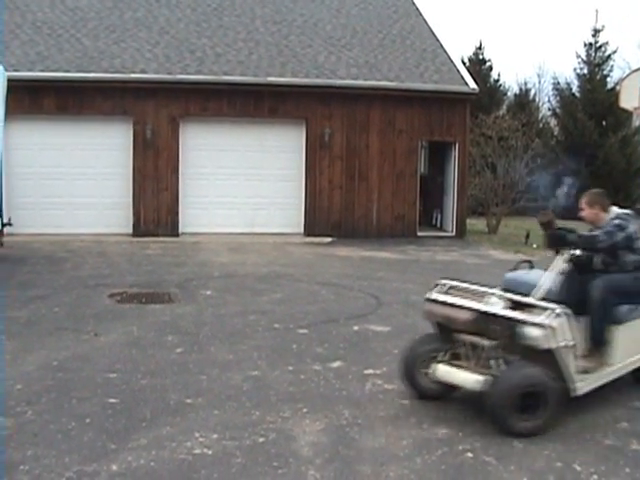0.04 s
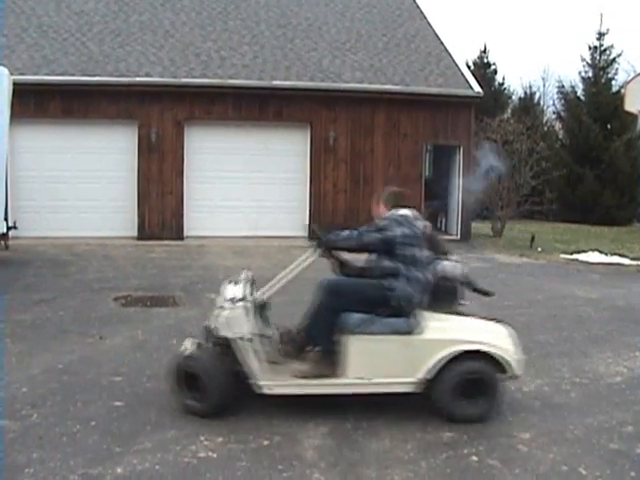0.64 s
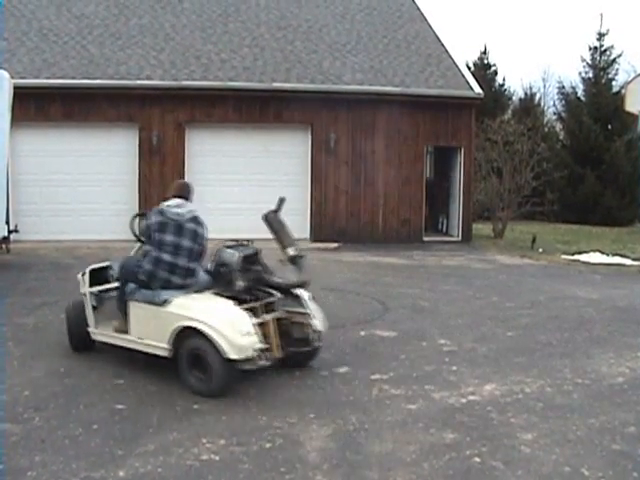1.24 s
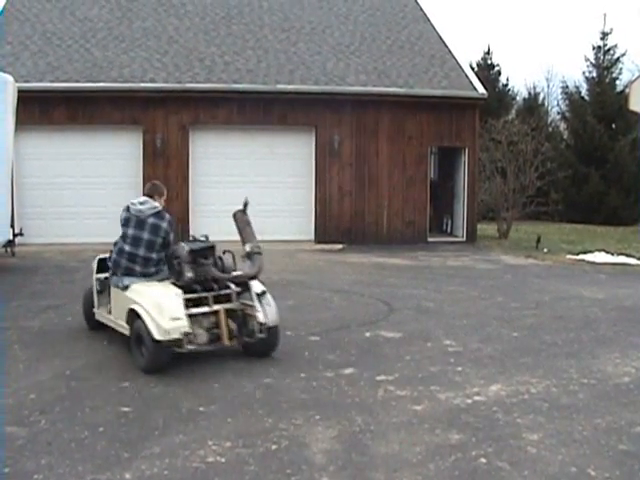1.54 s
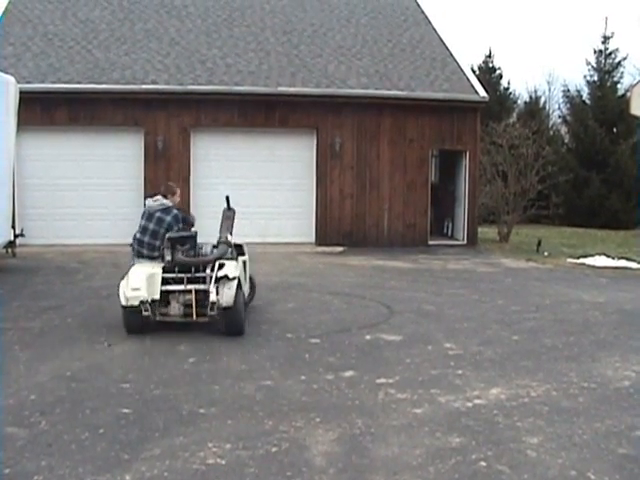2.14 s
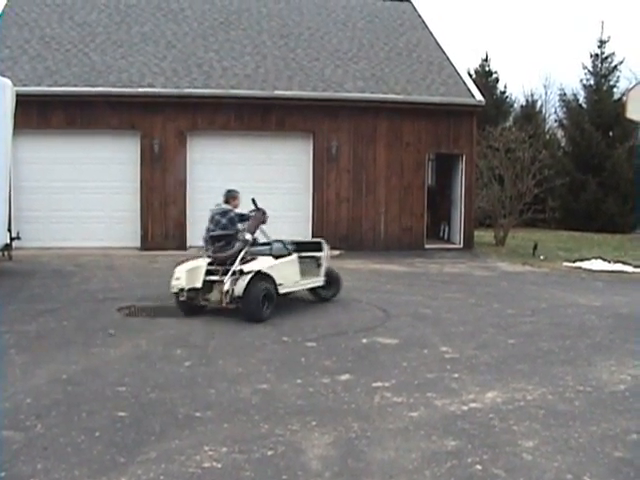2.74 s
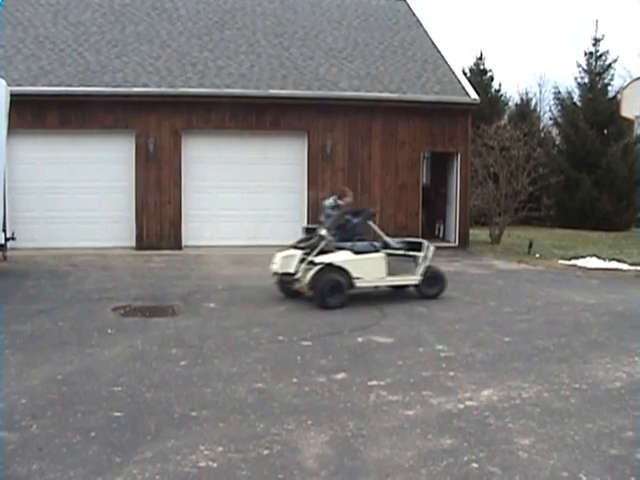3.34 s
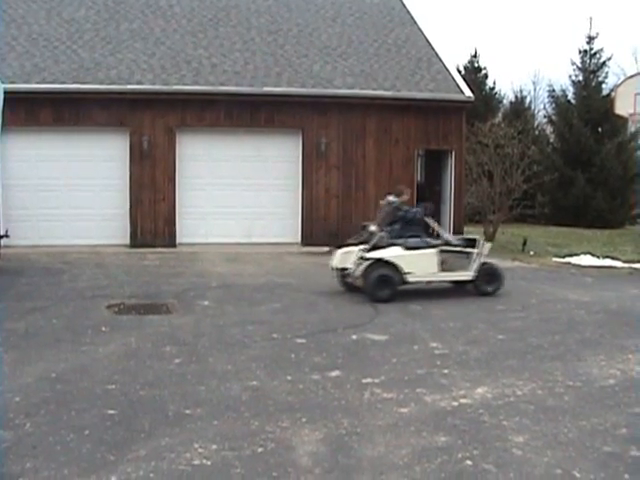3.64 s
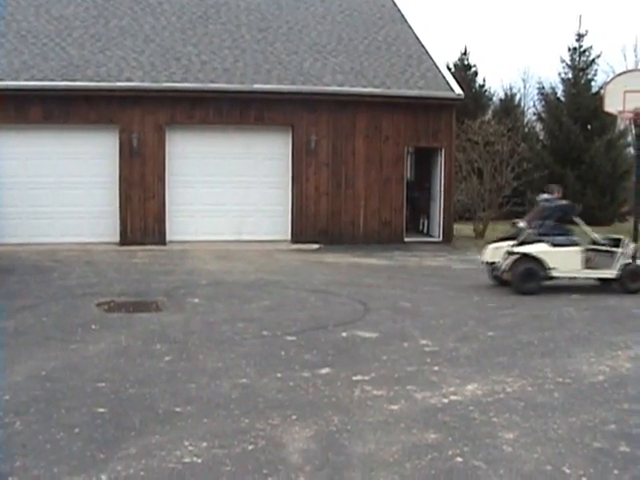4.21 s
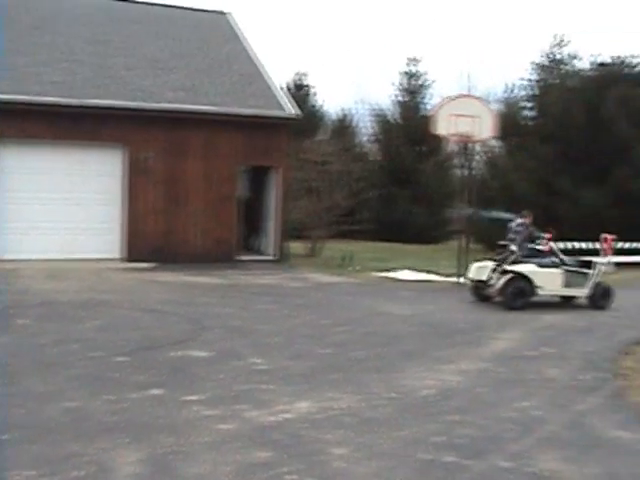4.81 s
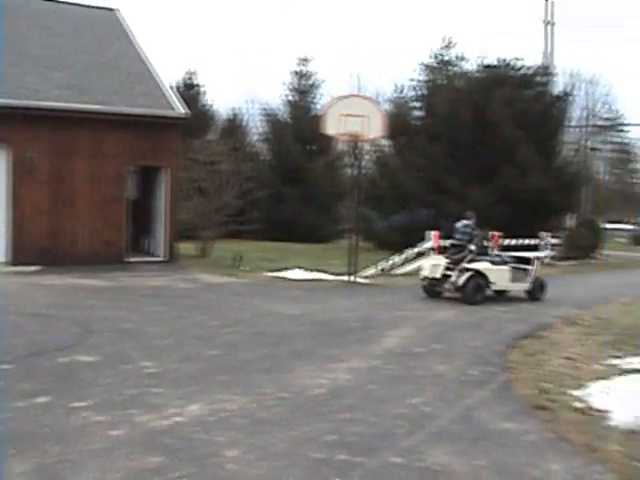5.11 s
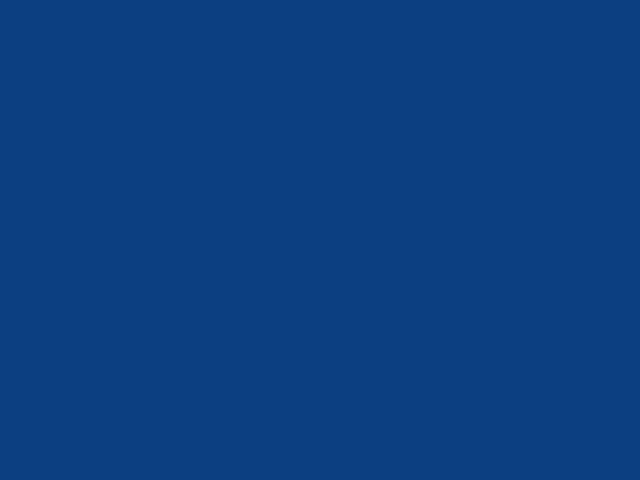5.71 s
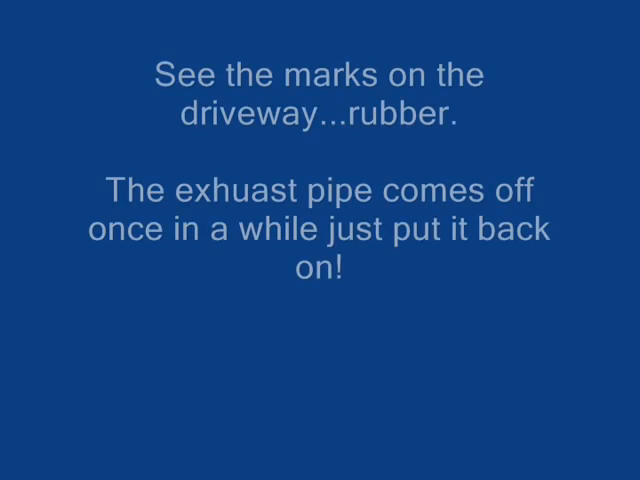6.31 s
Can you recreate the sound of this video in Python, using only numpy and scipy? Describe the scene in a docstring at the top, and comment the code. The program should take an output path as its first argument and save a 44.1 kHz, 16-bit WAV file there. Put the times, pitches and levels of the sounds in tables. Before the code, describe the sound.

Heard in stereo from one spot on a driveway, a cart's two-stroke engine sputters and pops, with one quick rev near the start. After coasting close by, it pulls away in a longer, rising, raspy buzz with a booming exhaust, then slackens, pops again and gives a last smaller rev. Low tyre rumble and a faint dull wall echo accompany it until the sound stops suddenly.

```python
"""A two-stroke cart with an upright exhaust stack circles a driveway, 3 to 15 m from a stereo microphone.
On the throttle the firings come evenly and the exhaust rasps; off it the engine pumps, stutters and pops.
The pipe booms and the stack howls as crank orders pass through their resonances; tyres rumble beneath.
A garage wall throws back a dull echo. The sound stops abruptly while the cart is still rolling."""
import sys
import numpy as np
from scipy import signal
from scipy.fft import rfft, irfft
from scipy.io import wavfile
from scipy.ndimage import uniform_filter1d

SR = 44100
rng = np.random.default_rng(int(sys.argv[2]) if len(sys.argv) > 2 else 0)


def persist_wave(psi):
    """Save psi, clipped to +-1, as 16-bit WAV."""
    counts = np.round(np.clip(psi, -1, 1) * 32767).astype(np.int16)
    wavfile.write(sys.argv[1], SR, np.atleast_2d(counts).T)


N = 284886
TIME = np.arange(N) / SR
BIN_HZ = np.maximum(np.arange(N // 2 + 1) * SR / N, 1)

# Speed of the crank. Each row: time in seconds, turns per second.
CRANK_SPEED = [(0.0, 128.3), (0.3, 120.7), (0.414, 119.7), (0.709, 137.4), (0.893, 128.8), (1.334, 117.9),
               (1.771, 109.9), (2.138, 106.0), (2.258, 108.3), (2.608, 124.3), (2.837, 129.7),
               (3.162, 133.1), (3.488, 141.4), (3.827, 174.7), (4.0, 184.7), (4.09, 187.5), (4.168, 178.1),
               (4.596, 163.4), (4.735, 161.5), (4.858, 162.3), (5.155, 173.9), (5.28, 170.1), (5.82, 156.7)]
# Throttle presses. Each row: start and end in seconds, opening 0-1, settled unevenness of firing 0-1.
THROTTLE_PRESSES = [(0.375, 0.691, 0.94, 0.26), (2.188, 2.626, 0.91, 0.33), (2.633, 3.453, 0.72, 0.45),
                    (3.443, 4.04, 0.88, 0.31), (4.048, 4.11, 0.3, 0.4), (4.436, 4.64, 0.33, 0.35),
                    (4.65, 5.14, 0.58, 0.31)]
# The cart's path. Each row: time in seconds, distance from the microphone in metres.
CART_DISTANCE = [(0, 4.2), (.6, 4), (1.3, 6.1), (2, 2.7), (4, 15.4), (5.82, 9.4)]
# Moving resonances of the hot gas: the pipe's lowest, its second, and the column in the stack.
# Each row: time in seconds, resonance in Hz, level in dB.
PIPE_BOOM = [(0.0, 313.0, -20), (0.56, 270, -24.5), (0.83, 322, -35), (1.29, 253, -27.5), (1.75, 258, -20),
             (2.24, 250, -18.5), (2.51, 326, -24.5), (2.62, 277, -24), (3.22, 305, -20), (3.39, 297, -14.5),
             (3.65, 260.0, -23.5), (3.8, 357, -17.5), (4.26, 245, -30.5), (4.9, 340, -19), (5.23, 277, -34),
             (5.82, 230, -37)]
PIPE_DRONE = [(0, 660, -22), (.37, 507, -22.5), (.43, 564, -10.5), (.56, 695, -14), (.72, 570, -10.5),
              (.745, 530, -21.5), (1.38, 560, -14), (1.86, 540, -20.5), (2.59, 490, -14.5),
              (2.78, 586, -19), (3.26, 604, -24), (3.4, 590, -14), (3.82, 603, -20), (3.94, 610, -12.5),
              (4.25, 570, -32), (4.5, 596, -23), (5.11, 622, -15), (5.17, 622, -25.5), (5.82, 463, -19.5)]
STACK_HOWL = [(0.0, 1120, -42.5), (0.32, 1090, -36.5), (0.68, 1378.0, -35), (1.45, 1470, -32),
              (1.86, 1505, -22.5), (2.0, 1240, -32.5), (2.16, 1230, -22.5), (2.39, 1222, -17.5),
              (2.83, 1343, -21.5), (3.08, 1210, -24.4), (3.18, 1310, -19.5), (3.46, 1240, -31),
              (3.95, 1160, -26), (4.16, 1520, -38.5), (4.51, 1244, -24.5), (5.09, 1358.0, -19),
              (5.3, 1364, -34), (5.82, 1142, -21)]
# How each part follows the engine. Each holds: level in dB when coasting at cruise speed,
# dB added at full throttle, dB added per octave of crank speed.
PUMP_LAW = (-34.5, 10.5, 31.5)
GROWL_LAW = (-36.5, 16, -22)
WHINE_LAW = (-40, 18.5, -2.5)
BARK_LAW = (-27.5, 8, 2.5)
RASP_LAW = (-37, 15.5, 13)
# Thudding of uneven burns. Each row: time in seconds, level in dB.
THUD_LEVEL = [(0, -16), (.26, -24.5), (.42, -17), (.56, -27.5), (1.2, -27), (2.1, -22.5), (2.48, -33),
              (2.95, -22), (3.6, -29.5), (4.3, -28), (4.55, -22), (4.82, -21.5), (5.05, -32.5),
              (5.35, -27.5), (5.58, -22), (5.82, -27)]
# Resonances of the pipe, the silencer can, the cylinder's cooling fins and the outlet.
# Each row: frequency in Hz, width in Hz, relative level in dB.
PIPE_MODES = [(164, 74, 2.5), (231.7, 98, 5.5), (318.4, 200, 6.5), (384, 127, 7.5), (510, 91, 1),
              (698, 83, -5)]
SILENCER_MODES = [(815, 290, -1), (1098, 83, 9.5), (1300, 109, 7), (1547, 125, 8.5), (1804, 220, 1),
                  (2070, 57, 5), (2498, 300, -4.5), (3590, 1600, -18.5)]
FIN_MODES = [(4620, 60, 2), (8500, 59, -10), (10500, 280, 1), (11500, 80, -1.5), (12360, 100, -7),
             (13400, 170, 2.5), (14050, 400, -4.5)]
OUTLET_MODES = [(3540, 120, -12.5), (4750, 170, -0.5), (6130, 400, -22), (8300, 500, -9.5),
                (10000, 660, -10.5)]
# Spectra of the exhaust's rasp, the tyres and chassis, and a pop's thump and crack.
# Each row: frequency in Hz, relative spectral density in dB.
RASP_SPECTRUM = [(700, -15.5), (1500, 10), (2500, 0.5), (3050, -0.5), (3450, 2), (3950, -3.5), (4500, -2.5),
                 (5200, -4.5), (6000, -4), (6800, -7), (9500, -8), (12000, -12.5), (15500, -16.5)]
RUMBLE_SPECTRUM = [(20, -21.5), (40, -35.5), (65, 9), (120, -17), (400, -25), (1500, 8.5), (8000, -9)]
THUMP_SPECTRUM = [(60, -17.5), (150, -3.5), (450, 2), (850, -5), (1400, -2.5), (2300, -8.5), (3500, -17.5),
                  (8000, -36)]
CRACK_SPECTRUM = [(800, -26), (2500, -5), (5000, 2), (9500, -2), (12500, -7), (16000, -16.5)]
# Lone firings of a built-up charge. Each row: start in seconds, crack drive in dB, thump drive in dB.
EXHAUST_POPS = [(0.0074, -25.5, -13), (0.0786, -26, -9), (0.133, -33, -19.5), (0.158, -24, -7),
                (0.164, -26.5, -17.5), (0.216, -21, -14.5), (0.305, -34, -10), (0.3317, -24, -11.5),
                (0.3797, -18.5, -6), (0.487, -26.5, -12.5), (0.833, -14, -7), (0.9184, -28.5, -17.5),
                (0.958, -16, -7.5), (1.0852, -12.5, -6), (1.2163, -12.5, -6.5), (1.3503, -19, -10),
                (1.4106, -21, -7.5), (1.506, -17.5, -7.5), (1.52, -20, -21), (1.7, -18.5, -6.5),
                (1.8103, -20.5, -8.5), (1.9461, -16, -5.5), (2.06, -17, -6.5), (2.153, -20, -7),
                (2.2097, -18.5, -6.5), (2.2653, -23.5, -8.5), (2.3042, -16.5, -8.5), (2.641, -15, -13),
                (2.9363, -12, -7), (3.1338, -19.5, -8.5), (3.4115, -10.5, -10), (3.5052, -21, -10),
                (4.3942, -26, -10), (4.4648, -26, -10), (4.552, -22, -8.5), (4.6744, -18.5, -8),
                (4.8215, -19.5, -10.5), (5.251, -13, -8.5), (5.4286, -19, -9.5), (5.566, -28.5, -12.5),
                (5.636, -26, -14.5)]
# Bursts of spitting at the outlet. Each row: start in seconds, end in seconds, level in dB.
OUTLET_SPITS = [(2.21, 2.36, -31.5), (2.494, 2.65, -30), (2.84, 3.115, -28), (3.15, 3.44, -38)]
# Echo off the garage wall. Each row: time in seconds, lag behind the direct sound in milliseconds.
GARAGE_DELAY = [(0, 60), (1, 49.6), (2, 40), (3, 32), (4, 25), (5.84, 34.4)]
# Likeness of left and right at the microphone. Each row: frequency in Hz, likeness 0-1.
MIC_LIKENESS = [(100, 1), (600, 0.96), (1200, 0.93), (2200, 0.8), (5000, 0.76), (10000, 0.9)]

CRUISE_TURNS_PER_S, REFERENCE_M = 120, 4
OPEN_S, SHUT_S = 0.089, 0.07  # rise and fall of a throttle press or a burst of spitting


def from_db(db):
    """Decibels to gain."""
    return 10 ** (np.asarray(db) / 20)


def in_time(rows):
    """Each column of a timed table at every sample."""
    seconds, *columns = np.transpose(rows)
    return [np.interp(TIME, seconds, column) for column in columns]


def spectrum(points):
    """A frequency table at every bin, joined on a log-frequency axis."""
    hz, value = np.transpose(points)
    return np.interp(np.log(BIN_HZ), np.log(hz), value)


def evened(x, size=4000):
    """Hold the running rms at 1."""
    power = uniform_filter1d(uniform_filter1d(x * x, size), size)
    return x / np.sqrt(np.maximum(power, 1e-12))


def coloured(x, points):
    """Minimum-phase filter with the given spectrum and unit power gain."""
    gain = from_db(spectrum(points))
    cepstrum = irfft(np.log(gain / np.sqrt(np.mean(gain ** 2))), N)
    cepstrum[1:N // 2] *= 2
    cepstrum[N // 2 + 1:] = 0
    return irfft(rfft(x) * np.exp(rfft(cepstrum)), N)


def passed(x, hz, kind, order=2):
    """Butterworth high- or low-pass."""
    return signal.sosfilt(signal.butter(order, hz, kind, fs=SR, output="sos"), x)


def resonate(x, modes):
    """Parallel resonances of alternating sign."""
    out = 0
    for k, (hz, width, db) in enumerate(modes):
        r = np.exp(-np.pi * width / SR)
        poles = [1, -2 * r * np.cos(2 * np.pi * hz / SR), r * r]
        ring = (1 - r * r) / 2 * signal.lfilter([1, 0, -1], poles, x + 1e-18)
        out += (-1) ** k * from_db(db) * ring
    return out


def drift(hz):
    """A random wander of spread 1."""
    knots = np.arange(0, N / SR + 1, 1 / hz)
    return np.interp(TIME, knots, rng.standard_normal(len(knots))) * np.sqrt(3 / 2)


def clicks(times, heights):
    """Impulses placed between samples."""
    at = np.clip(np.asarray(times) * SR, 0, N - 2)
    i = at.astype(int)
    return np.bincount(i, heights * (1 - at + i), N) + np.bincount(i + 1, heights * (at - i), N)


def fading(x, decay_ms):
    """Every impulse dies away exponentially from its own height."""
    return signal.lfilter([1], [1, -np.exp(-1000 / (decay_ms * SR))], x + 1e-18)


def delayed(x, ms):
    """The sound a little later; the delay may move."""
    return np.interp(TIME - ms / 1000, TIME, x, left=0)


def held(start, end):
    """Opens at the start, holds, shuts after the end."""
    return np.clip((TIME - start) / OPEN_S, 0, 1) * np.clip(1 - (TIME - end) / SHUT_S, 0, 1)


def throttle():
    """Opening of the throttle; 1 is full."""
    return sum(opening * held(start, end) for start, end, opening, _ in THROTTLE_PRESSES)


def effort_db(law):
    """A level that rises with the throttle and follows the crank speed."""
    coast_db, throttle_db, octave_db = law
    octaves = np.log2(in_time(CRANK_SPEED)[0] / CRUISE_TURNS_PER_S)
    return coast_db + throttle_db * throttle() + octave_db * octaves


def nearness_db():
    """Spreading: the level at the microphone against that of a cart REFERENCE_M away."""
    return 20 * np.log10(REFERENCE_M / in_time(CART_DISTANCE)[0])


def crank(wobble):
    """Turns made so far at a slightly unsteady speed, and the moments when the exhaust port opens."""
    turns = np.cumsum(in_time(CRANK_SPEED)[0] * (1 + wobble * drift(35))) / SR
    return turns, np.interp(np.arange(1, int(turns[-1])), turns, TIME)


def stutter(coasting=0.66, catch=0.24, catch_s=0.36):
    """Unevenness of the firings, 0-1: high when coasting; each press catches roughly, then settles."""
    uneven = coasting
    for start, end, _, settled in THROTTLE_PRESSES:
        catching = catch * np.exp(-np.maximum(TIME - start - OPEN_S, 0) / catch_s)
        uneven += held(start, end) * (settled - coasting + catching)
    return np.clip(uneven, 0, 1)


def picked(orders, uneven, centre_hz, db, width_hz, flutter_db, waver_db):
    """A resonance picks out passing crank orders; each wavers, and all flutter with the stutter."""
    speed, out = in_time(CRANK_SPEED)[0], 0
    for k, tone in orders.items():
        detuning = (k * speed - centre_hz) / width_hz
        out += tone * from_db(waver_db * drift(14)) / (1 + detuning ** 2)
    return from_db(db + flutter_db * uneven * drift(75)) * evened(out)


def pipe_boom(turns, uneven):
    """The piston pumps once a turn and drives the pipe in low orders, each with its own delay."""
    orders = {k: np.cos(2 * np.pi * k * (turns + 1 / 4) - k * k / 2) for k in range(2, 8)}
    boom = picked(orders, uneven, *in_time(PIPE_BOOM), width_hz=14, flutter_db=3.5, waver_db=2)
    drone = picked(orders, uneven, *in_time(PIPE_DRONE), width_hz=69, flutter_db=3.5, waver_db=4)
    pump = from_db(effort_db(PUMP_LAW) + 0.98 * nearness_db()) * np.cos(2 * np.pi * (turns + 1 / 6))
    return pump + boom + drone


def stack_howl(turns, uneven, cool_growl_hz=686, cool_whine_hz=1684, heat_s=0.17, hot_rise=0.26):
    """The stack sings in higher orders: a sharp howl, a growl below it and a whine above."""
    orders = {k: np.cos(2 * np.pi * k * (turns - 1 / 4)) for k in range(5, 19)}
    howl = picked(orders, uneven, *in_time(STACK_HOWL), width_hz=45, flutter_db=5, waver_db=2.5)
    # The gas heats under throttle and lifts the growl and the whine.
    keep = np.exp(-1 / (heat_s * SR))
    lift = 1 + hot_rise * signal.lfilter([1 - keep], [1, -keep], throttle())
    growl = picked(orders, uneven, cool_growl_hz * lift, effort_db(GROWL_LAW) + 0.55 * nearness_db(),
                   width_hz=140, flutter_db=6.5, waver_db=3.5)
    whine = picked(orders, uneven, cool_whine_hz * lift, effort_db(WHINE_LAW),
                   width_hz=170, flutter_db=6, waver_db=4.5)
    return howl + growl + whine


def tyre_rumble():
    """Tyres and chassis rumble over the driveway, a little louder near the microphone."""
    return from_db(-33.5 + 0.27 * nearness_db()) * coloured(rng.standard_normal(N), RUMBLE_SPECTRUM)


def exhaust_port(firings, uneven, spread_db, jitter_s, puff_ms):
    """Each opening lets out a pressure step and a turbulent puff; stutter scatters their strengths."""
    luck, late = rng.standard_normal((len(firings), 2)).T
    unevenness = np.interp(firings, TIME, uneven)
    # A weak burn leaves fuel for a strong one on the next turn.
    burn = np.clip(luck - 0.19 * np.roll(luck, 1), -1.6, 1.6)
    strength = from_db(spread_db * unevenness * burn)
    steps = clicks(firings + jitter_s * unevenness * late, strength ** 0.68)
    flow = fading(clicks(firings, strength), puff_ms) + 0.64
    return burn, strength, evened(baffles(steps)), evened(flow * rng.standard_normal(N))


def baffles(x):
    """Reflections between the silencer's baffles spread each step over a few milliseconds."""
    for lag in (17, 29, 47, 61):
        loop = np.r_[1, np.zeros(lag - 1), 0.5]
        x = signal.lfilter(loop[::-1], loop, x + 1e-18)
    return x


def pipe_thud(firings, burn):
    """Uneven burns knock on the pipe's resonances."""
    knocks = resonate(clicks(firings, burn), PIPE_MODES)
    return from_db(in_time(THUD_LEVEL)[0]) * evened(passed(knocks, 85, "high"))


def silencer_bark(steps, puffs, uneven):
    """The can rings out across the driveway: a clean buzz on steady firing, breathy in a stutter."""
    can = resonate(steps + (0.15 + 0.9 * uneven) * puffs, SILENCER_MODES)
    can = passed(passed(can, 700, "high", order=4), 4900, "low", order=4)
    return from_db(effort_db(BARK_LAW)) * evened(driveway_echo(can, wall_db=-7))


def exhaust_rasp(steps, puffs, uneven):
    """Turbulent gas rasps; the pressure steps add buzz as the firing steadies."""
    buzz = 2.8 * (1 - uneven) ** 2 * passed(steps, 5500, "low")
    return from_db(effort_db(RASP_LAW)) * evened(coloured(puffs + buzz, RASP_SPECTRUM))


def fin_ring(puffs):
    """The cooling fins ring high, louder under load and near the microphone."""
    level_db = -31 + 0.5 * effort_db(RASP_LAW) + 0.3 * nearness_db() + 1.5 * drift(5.2)
    return from_db(level_db) * evened(resonate(resonate(puffs, FIN_MODES), FIN_MODES))


def exhaust_pops(thump_ms, crack_ms, bounce_ms):
    """A sharp pressure front, then a burst of gas; the asphalt returns it a moment later."""
    starts, crack_db, thump_db = np.transpose(EXHAUST_POPS)
    front = clicks(starts, from_db(thump_db))
    thump = 0.5 * fading(front, thump_ms) * rng.standard_normal(N) - 5.85 * front
    crack = 0.5 * fading(clicks(starts, from_db(crack_db)), crack_ms) * rng.standard_normal(N)
    direct = coloured(thump, THUMP_SPECTRUM) + coloured(crack, CRACK_SPECTRUM)
    return driveway_echo(direct + 0.55 * delayed(direct, bounce_ms), wall_db=-10.5)


def outlet_spits(firings, strength):
    """The narrow outlet rings in the treble in short spells, most on every other turn."""
    every_other = np.arange(len(firings)) % 2
    kicks = clicks(firings, strength ** 0.6 * from_db(-9 * every_other))
    spits = fading(kicks, decay_ms=2.6) * rng.standard_normal(N)
    spells = sum(from_db(db) * held(start, end) for start, end, db in OUTLET_SPITS)
    return spells * evened(resonate(spits, OUTLET_MODES))


def driveway_echo(x, wall_db, decay_s=0.2, size=13000):
    """The direct sound, one dull echo off the garage and a thin scatter from trees and ground."""
    tail = rng.standard_normal(size) * from_db(-60 * TIME[:size] / decay_s)
    scatter = from_db(-10) * signal.fftconvolve(x, tail / np.linalg.norm(tail))[:N]
    wall = from_db(wall_db) * delayed(x, in_time(GARAGE_DELAY)[0])
    return x + passed(wall + scatter, 4200, "low")


def stereo_microphone(x, size=400):
    """Two close ports hear the same bass; short, shifting reflections make the treble differ."""
    alike = np.clip(spectrum(MIC_LIKENESS), 0, 0.998)
    reflections = rfft(rng.standard_normal(size) * np.hanning(2 * size)[size:], N)
    apart = rfft(x) * np.sqrt((1 - alike) / (1 + alike)) * reflections / np.abs(reflections)
    angle = np.pi * drift(2.4)
    side = np.cos(angle) * irfft(apart, N) + np.sin(angle) * irfft(1j * apart, N)
    return np.array([x + side, x - side]) * from_db([[0.22], [-0.22]])


def scene():
    """The engine over the rumble of tyres and chassis, heard from one spot on the driveway."""
    turns, firings = crank(wobble=0.00229)
    uneven = stutter()
    engine = pipe_boom(turns, uneven) + stack_howl(turns, uneven)
    burn, strength, steps, puffs = exhaust_port(firings, uneven, spread_db=8, jitter_s=5e-5, puff_ms=5)
    engine += pipe_thud(firings, burn)
    engine += silencer_bark(steps, puffs, uneven) + exhaust_rasp(steps, puffs, uneven)
    engine += outlet_spits(firings, strength) + fin_ring(puffs)
    engine += exhaust_pops(thump_ms=14.6, crack_ms=7.2, bounce_ms=5.4)
    return stereo_microphone(passed(engine, 53, "high") + tyre_rumble())


def record(dry):
    """Peaks are rounded, the sound stops at once, the top is cut."""
    ceiling, stop_s, cutoff_hz = 1.3, 5.84, 16000
    rounded = ceiling * np.tanh(dry / ceiling)
    running = np.clip((stop_s - TIME) / 0.003 + 1, 0, 1)
    return signal.sosfilt(signal.ellip(10, 0.1, 90, cutoff_hz, fs=SR, output="sos"), rounded * running)


dry = scene()
out = record(dry)
persist_wave(out)
```